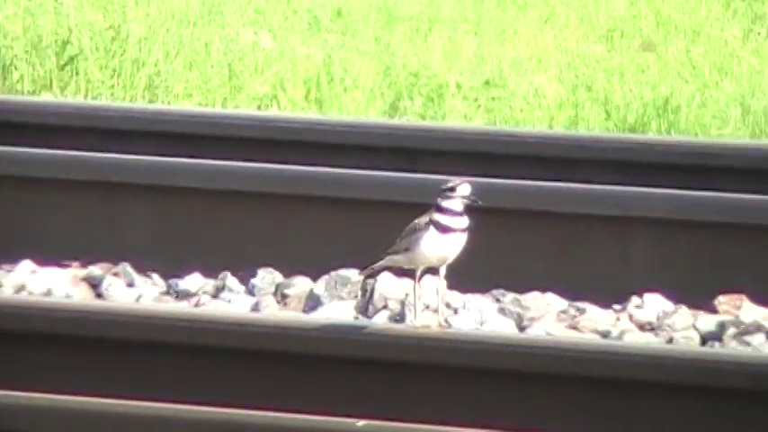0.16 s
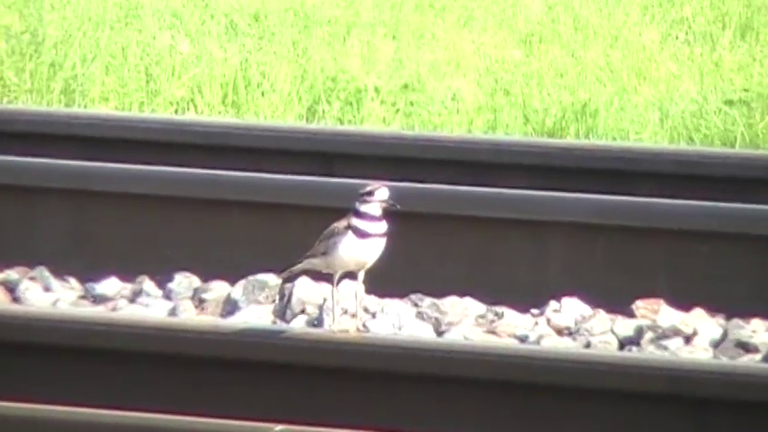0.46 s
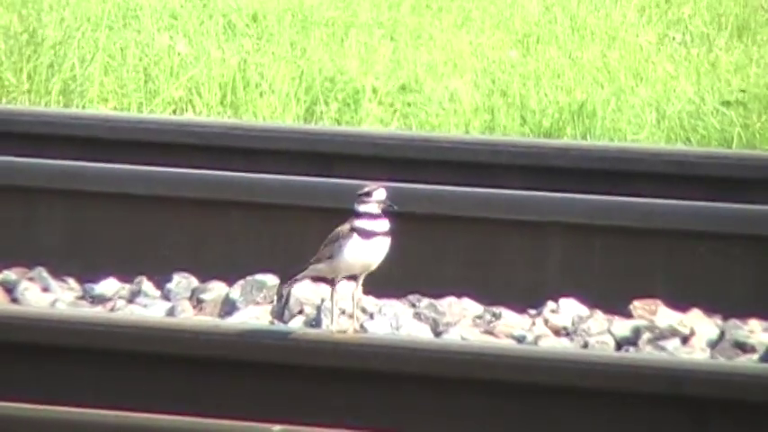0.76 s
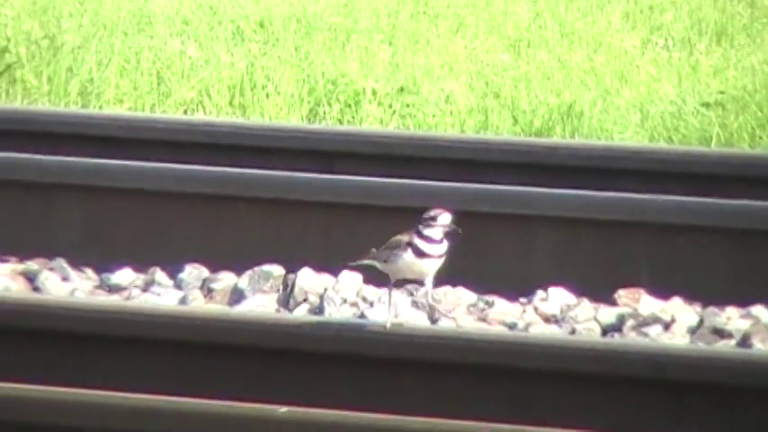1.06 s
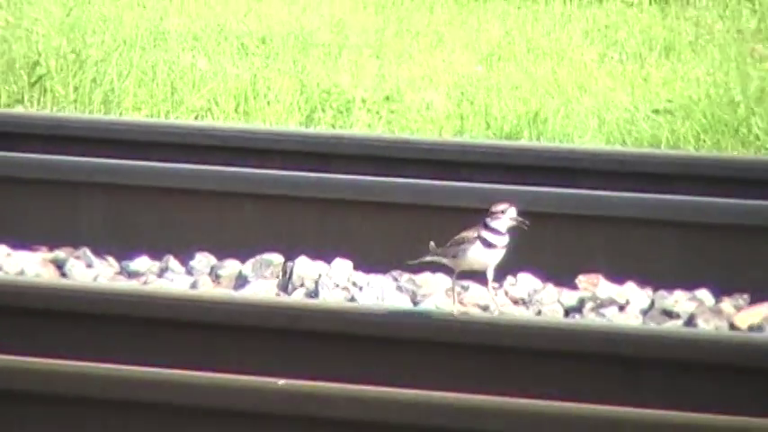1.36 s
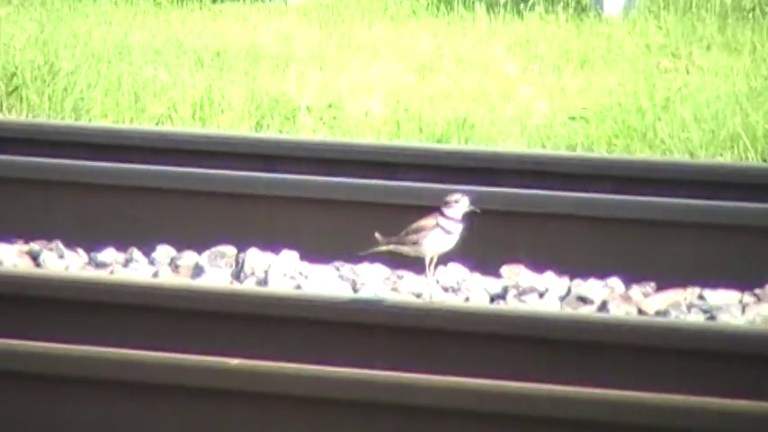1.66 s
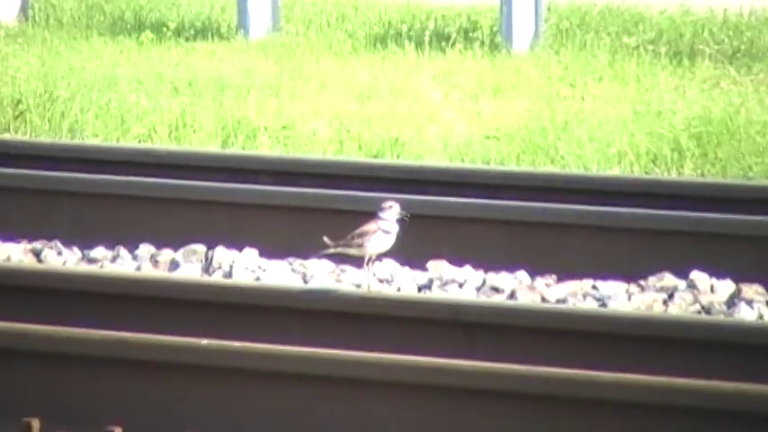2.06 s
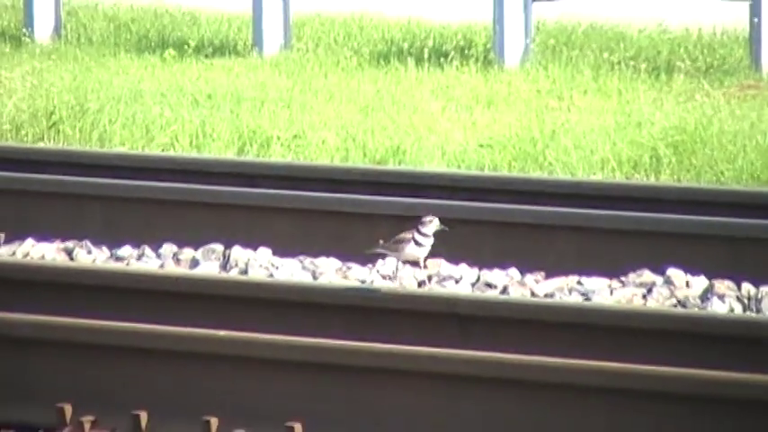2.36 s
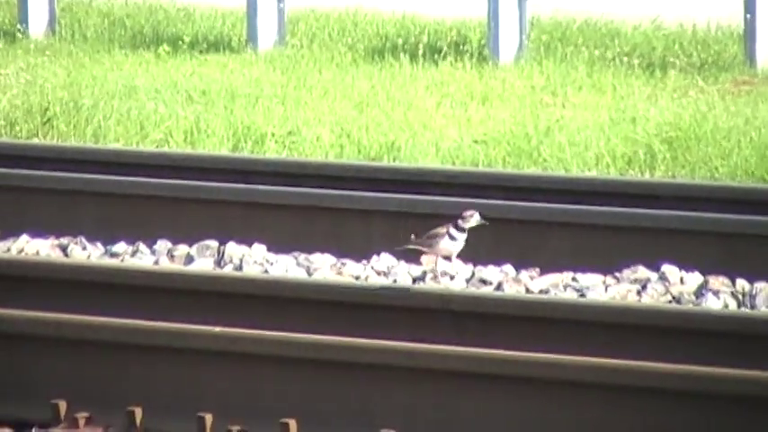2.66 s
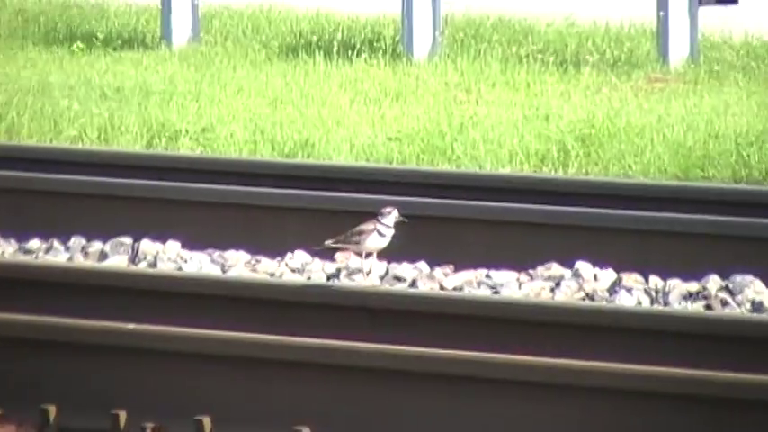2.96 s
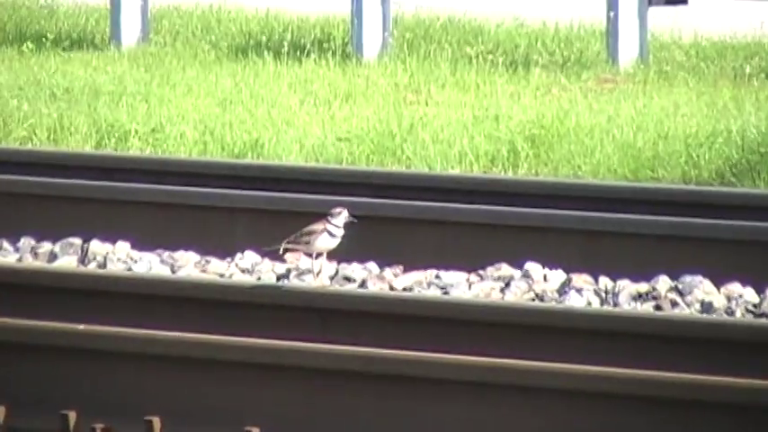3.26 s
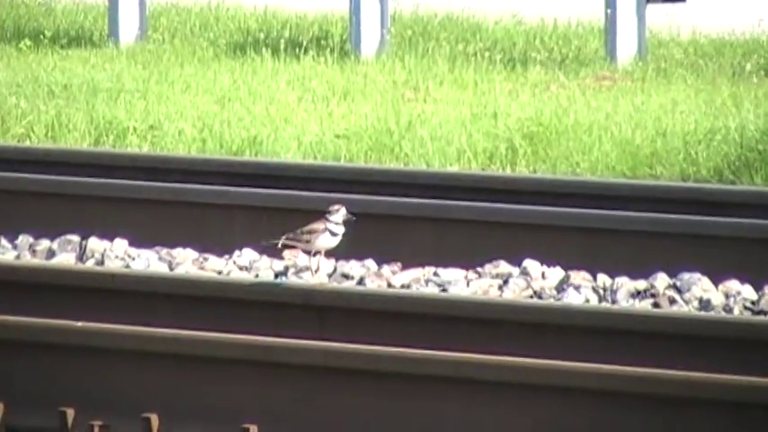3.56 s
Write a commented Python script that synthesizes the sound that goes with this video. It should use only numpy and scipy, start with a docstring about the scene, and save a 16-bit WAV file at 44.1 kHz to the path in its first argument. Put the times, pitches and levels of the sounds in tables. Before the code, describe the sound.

A killdeer pipes six short, clear high notes, evenly spaced, fairly close in open air; a distant engine and traffic rumble behind, small handling ticks, and a fainter bird whistles thinly near the end.

```python
"""Railway ballast: a killdeer gives six clear notes, near-pure tones that flick up, settle and lift.
A farther songbird adds two thin sliding whistles and two tiny chips, with more diffuse tail.
Some way off a six-cylinder engine, built from sines locked to its cycle, pulls up to speed and eases off.
Banded noise makes low traffic rumble, road roar and a hiss that swells as the engine peaks; faint whines
ride on the roar. Resonant bursts make dry ticks, low knocks and a rasp in the killdeer's second note."""
import sys
import numpy as np
from scipy import signal
from scipy.io import wavfile

SR = 44100
rng = np.random.default_rng(int(sys.argv[2]) if len(sys.argv) > 2 else 0)


def persist_wave(psi):
    """Save psi, clipped to +-1, as 16-bit WAV."""
    counts = np.round(np.clip(psi, -1, 1) * 32767).astype(np.int16)
    wavfile.write(sys.argv[1], SR, np.atleast_2d(counts).T)


N = 164052
T = np.arange(N) / SR  # seconds

# Stereo balance of the background: f/Hz, left minus right/dB
BACKGROUND_BALANCE = [(30, -5), (70, -5), (170, 2), (350, 2.5), (700, 1.6), (1400, 0), (5000, -1),
                      (10000, -0.5)]


def from_db(db):
    """Decibels to gain."""
    return 10 ** (np.asarray(db) / 20)


def rms_one(x):
    """Scale to rms 1."""
    return x / np.sqrt(np.mean(x ** 2) + 1e-20)


def in_time(rows):
    """A curve of (t/s, value) read at every sample."""
    return np.interp(T, *np.transpose(rows))


def at_hz(points, hz):
    """Read a curve of (f/Hz, value) on a log-frequency axis."""
    f, value = np.transpose(points)
    return np.interp(np.log(hz), np.log(f), value)


def pan(db):
    """Left and right gains for a left-minus-right level difference in dB."""
    return from_db(np.array([[db], [-db]]) / 2)


def turns(hz):
    """Running phase of a pitch curve, in radians."""
    return 2 * np.pi * np.cumsum(hz) / SR


def drift(rate_hz):
    """Random motion of spread 1: noise through two equal poles at rate_hz, run at SR / 40."""
    pole = np.exp(-2 * np.pi * rate_hz * 40 / SR)
    noise = rng.standard_normal(N // 40 + 2002)
    slow = signal.lfilter([1], [1, -2 * pole, pole ** 2], noise)[2000:]  # drop the settling
    return np.interp(np.arange(N) / 40, np.arange(len(slow)), rms_one(slow))


def resonate(x, hz, width_hz):
    """One resonance with gain 1 on top."""
    return signal.lfilter(*signal.iirpeak(hz, hz / width_hz, fs=SR), x + 1e-18)


def gate(t, length, attack, release):
    """Rounded attack, hold and release, all in seconds."""
    opening = np.sin(np.pi / 2 * np.clip(t / attack, 0, 1))
    closing = np.sin(np.pi / 2 * np.clip((length - t) / release, 0, 1)) ** 2
    return opening * closing


def scatter(x):
    """Diffuse tail thrown back by grass, rails and trees: decaying noise, different on each side."""
    t60_s, build_s = 1.5, .024
    t = T[:SR]
    tail = rng.standard_normal((2, SR)) * from_db(-60 * t / t60_s) * np.minimum(t / build_s, 1)
    return signal.fftconvolve(x[None], rms_one(tail) / np.sqrt(SR), axes=1)[:, :N]


def killdeer():
    """A near-pure tone flicks up to a crest, settles, sags and lifts; echoes vary as the bird runs."""
    # Notes: t/s, length/s, level/dB, crest f/Hz, held f/Hz, crest accent/dB, echo delay/s, echo level/dB
    notes = [(0.1187, 0.12, -33, 4750, 4357, -2, 0.062, -17),
             (0.709, 0.12, -31.5, 4855, 4400, 2, .024, -24),
             (1.3567, 0.12, -34.5, 4930, 4410, 1.5, 0.037, -23),
             (2.082, 0.12, -34.5, 4890, 4450, 0.5, .035, -23),
             (2.8627, 0.124, -34.5, 4730, 4420, 0, 0.043, -22),
             (3.5013, 0.12, -34.5, 4990, 4480, -1, .042, -14)]
    # Partials of the voice: multiple of the sung pitch, level on the held part/dB, level on the crest/dB
    partials = [(.5, -26, -21), (1, 2, 5), (2, -27, -21), (2.5, -43, -41), (3, -46, -49)]
    crest_s, rise_s, fall_s, crest_roundness = .01294, .01216, .019, 2.28
    sag_hz, sag_at_s, sag_width_s = 45, .087, .017
    lift_hz, lift_s = 125, .011
    waver_hz, waver_db, waver_rate_hz = 8, .6, 160
    tail_db = -23.5

    voice, echoes = np.zeros(N), np.zeros(N)
    pitch_waver = waver_hz * drift(waver_rate_hz)
    level_waver = waver_db * drift(waver_rate_hz)
    for start, length, db, crest_hz, held_hz, accent_db, echo_s, echo_db in notes:
        span = (T >= start) & (T < start + length)
        t = T[span] - start
        crest_width = np.where(t < crest_s, rise_s, fall_s)
        crest = np.exp(-np.abs((t - crest_s) / crest_width) ** crest_roundness)
        lift = lift_hz * np.exp((t - length) / lift_s)
        sag = sag_hz * np.exp(-((t - sag_at_s) / sag_width_s) ** 2)
        phase = turns(held_hz + (crest_hz - held_hz) * crest + lift - sag + pitch_waver[span])
        tone = sum(from_db(held_db + (top_db - held_db) * crest) * np.sin(k * phase)
                   for k, held_db, top_db in partials)
        level = from_db(db + accent_db * crest + level_waver[span])
        note = np.sqrt(2) * tone * level * gate(t, length, attack=.009, release=.012)
        voice[span] += note
        echoes += from_db(echo_db) * np.interp(T - echo_s, T[span], note, left=0, right=0)
    # the echo carries the crest of a note better than its held part
    echoes = resonate(echoes, hz=4900, width_hz=550)
    return (voice + echoes) * pan(db=-1.7) + from_db(tail_db) * scatter(voice)


def far_birds():
    """Two thin whistles swell and slide onto a level pitch, with two tiny high chips, wetter with distance."""
    # Calls: t/s, length/s, level/dB, first f/Hz, last f/Hz, slide/s, swell/s
    whistles = [(2.865, 0.019, -48, 7900, 8150, .01, .006), (3.06, 0.302, -44, 5118, 5028, .072, 0.085),
                (3.487, .022, -51.5, 7100, 7400, .012, 0.0074), (3.588, 0.15, -44, 4980, 4900, .062, 0.035)]
    waver_hz, waver_db, lead_in_db = 7, 1.2, -16
    echo_s, echo_db, tail_db = .08, -9, -15

    voice, pitch_waver = np.zeros(N), waver_hz * drift(40)
    for start, length, db, first_hz, last_hz, slide, swell_s in whistles:
        t = T - start
        pitch = last_hz + (first_hz - last_hz) * np.exp(-(t / slide) ** 2) + pitch_waver
        swell = from_db(lead_in_db * np.clip(1 - t / swell_s, 0, 1))
        tone = np.sqrt(2) * from_db(db) * np.sin(turns(pitch))
        voice += tone * swell * gate(t, length, attack=.005, release=length / 10)
    voice = voice * from_db(waver_db * drift(25))
    echo = from_db(echo_db) * np.interp(T - echo_s, T, voice)
    return (voice + echo) * pan(db=-2.0) + from_db(tail_db) * scatter(voice)


def ticks_knocks_and_rasp():
    """Dry ticks, low knocks and a rasp in the killdeer's voice: a snap and gritty trace in a resonance."""
    # Bursts: t/s, peak level/dB ahead of panning, centre f/Hz, width/Hz
    # The pair near .74 s is the rasp in the killdeer's second note, where its voice breaks register
    bursts = [(0.0332, -20.5, 5200, 6000), (.548, -25, 800, 300), (.741, -26, 4960, 1700),
              (.748, -36, 4830, 1500), (.977, -18.5, 780, 300), (1.039, -29, 3000, 2500),
              (1.17, -24, 850, 295), (1.775, -39, 9600, 1410), (2.851, -31, 8800, 2980),
              (3.5448, -14.5, 3150, 2600)]
    grit_db, grit_decay_s = -20, .003
    top_ratio, top_limit_hz = 2.6, 10200

    out, t = np.zeros((2, N)), T[:SR // 50]
    for start, db, hz, width_hz in bursts:
        snap = t == 0
        grit = from_db(grit_db) * rng.standard_normal((2, len(t))) * np.exp(-t / grit_decay_s)
        ringing = resonate(resonate(snap + grit, hz, width_hz), hz, 2 * width_hz)
        # lower bursts are softer
        soften = signal.butter(4, min(top_ratio * hz, top_limit_hz), fs=SR, output="sos")
        burst = signal.sosfilt(soften, ringing)
        i = int(start * SR)
        out[:, i:i + len(t)] += from_db(db) * burst / np.abs(burst).max()
    return out * pan(db=-1.5)


def engine(speed):
    """The firing note, and the orders of uneven cylinders sweeping through the exhaust resonances."""
    # Firing note: t/s, level/dB
    firing_level = [(0, -36.5), (.3, -30), (.6, -38.5), (1.1, -39.5), (1.7, -45.5), (2.4, -44.5),
                    (3.05, -41.5), (3.72, -46.5)]
    # Gain of the whole exhaust drone: t/s, level/dB
    load = [(0, -36.5), (.8, -38), (1.5, -35), (2.0, -33.5), (2.45, -30), (2.75, -34), (3.05, -32),
            (3.4, -36), (3.72, -40.5)]
    # Engine orders: multiples of the cycle rate
    order_numbers = [9, 12, 15, 18, 20, 21, 22, 23, 24, 31]
    # Relative level of each order inside a resonance: level/dB
    order_db = [3, -2, -5, -5, 1, -11, 0, -2, -2, -1]
    # Exhaust resonances that lift passing orders: f/Hz, width/Hz
    pipes = [(314, 28), (368, 24)]
    cylinders = 6
    off_pipe_db = -11
    order_wander = .35  # radians; uneven firing blurs the phase of each order

    cycle, drone = turns(speed), 0  # cycle phase in radians
    firing = np.sqrt(2) * from_db(in_time(firing_level) + drift(12)) * np.sin(cylinders * cycle)
    for k, db in zip(order_numbers, order_db):
        in_pipe = sum(np.exp(-((k * speed - hz) / width_hz) ** 2) for hz, width_hz in pipes)
        phase = k * cycle + rng.uniform(0, 2 * np.pi) + order_wander * drift(8.6)
        level = from_db(db + off_pipe_db * (1 - in_pipe) + drift(8.3))
        drone = drone + level * np.sin(phase)
    return firing * pan(db=4) + from_db(in_time(load)) * drone * pan(db=4)


def banded_noise(spectrum, patchy_db):
    """Stereo noise in narrow bands, each with its own level, flicker, likeness and balance; rms 1."""
    # Likeness of the two sides: f/Hz, correlation (1 same, 0 unrelated, -1 opposite)
    likeness = [(25, -.7), (55, -.2), (90, .6), (140, .94), (250, .93), (500, .93), (1000, .85),
                (2000, .55), (4000, .3), (8000, 0), (14000, -.1)]
    edges = np.geomspace(20, 16000, 44)  # Hz
    out, white = 0, rng.standard_normal((2, 2, N))
    for k, (low, high) in enumerate(zip(edges, edges[1:])):
        hz = np.sqrt(low * high)
        if spectrum[0][0] <= hz <= spectrum[-1][0]:
            band = signal.butter(4, [low, high], "band", fs=SR, output="sos")
            mid, side = signal.sosfilt(band, white[k % 2])  # neighbouring bands use separate noise
            alike = np.clip(at_hz(likeness, hz), -1, 1)
            stereo = np.sqrt(1 + alike) * mid + np.sqrt(1 - alike) * side * [[1], [-1]]
            level = from_db(at_hz(spectrum, hz) + patchy_db * drift(19))
            out = out + level * pan(at_hz(BACKGROUND_BALANCE, hz)) * stereo
    return rms_one(out)


def traffic(speed):
    """Low rumble and road roar: banded noise that throbs once per engine cycle."""
    # Rumble spectrum: f/Hz, relative level/dB per Hz
    rumble_spectrum = [(20, -34), (40, -9), (60, -6.5), (90, -5), (130, -1), (220, 2.5), (310, -5),
                       (420, -7.5), (600, -13.5), (1000, -16), (2000, -70)]
    # Rumble in time, ahead of its trim: t/s, level/dB
    rumble_level = [(0, -29.5), (.15, -30), (.45, -28.5), (.8, -30), (.95, -31.5), (1.35, -30), (1.7, -32),
                    (2.1, -32), (2.6, -33.5), (2.9, -30), (3.2, -33), (3.72, -29)]
    # Road roar spectrum: f/Hz, relative level/dB per Hz
    roar_spectrum = [(100, -40), (350, -2), (550, -0.5), (800, -2.5), (1100, -2.5), (1500, -5),
                     (1900, -11.5), (2600, -18.5), (4000, -26.5), (8000, -31.5), (16000, -87)]
    # Road roar in time: t/s, level/dB
    roar_level = [(0.0, -34.5), (0.05, -38.5), (1.13, -34), (1.16, -37), (1.17, -32), (1.24, -35),
                  (2.24, -32.5), (2.81, -30), (3.68, -33), (3.72, -32)]
    rumble_trim_db, throb_depth = .5, .02

    rumble = from_db(rumble_trim_db + in_time(rumble_level)) * banded_noise(rumble_spectrum, patchy_db=1.5)
    roar = from_db(in_time(roar_level)) * banded_noise(roar_spectrum, patchy_db=1.33)
    return (rumble + roar) * (1 + throb_depth * np.sin(turns(speed)))


def howls():
    """Noise in resonances of the rumble and roar, each swelling and fading once."""
    # Resonances: f/Hz, width/Hz, level at the loudest/dB, loudest at t/s, spread/s
    resonances = [(242, 45, -30, 0.32, 0.17), (181, 35, -36.5, 0.77, 0.2), (235, 54, -31.5, 3.386, 0.25),
                  (1385, 54, -46, 1.04, 1), (2430, 1600, -44.5, 3, 0.91)]
    out = 0
    for hz, width_hz, db, at, spread in resonances:
        noise = rng.standard_normal(N)
        howl = rms_one(resonate(resonate(noise, hz, width_hz), hz, 2 * width_hz))
        swell = from_db(db) * np.exp(-((T - at) / spread) ** 2)
        out = out + swell * howl * pan(at_hz(BACKGROUND_BALANCE, hz))
    return out


def whines():
    """Faint wavering tones in the road roar, probably from tyres, each coming and going once."""
    # Tones: f/Hz, level at the loudest/dB, loudest at t/s, spread/s
    tones = [(1165, -36, 2.48, 0.14), (1167, -40, 2.76, 0.091), (1173, -39, 2.88, 0.17),
             (1580, -41, 2.594, .07), (1554, -40.5, 2.84, 0.14), (774, -42, 2.56, 0.1),
             (860, -43, 2.88, 0.13), (1066, -44, 2.7, 0.34)]
    waver_hz, waver_db, waver_rate_hz = 14, 2.2, 22
    out = 0
    for hz, db, at, spread in tones:
        level = from_db(db + waver_db * drift(19)) * np.exp(-((T - at) / spread) ** 2)
        tone = np.sqrt(2) * np.sin(turns(hz + waver_hz * drift(waver_rate_hz)))
        out = out + level * tone * pan(at_hz(BACKGROUND_BALANCE, hz))
    return out


def hiss():
    """Banded noise that falls away above an edge to a faint trace of air."""
    # Hiss spectrum ahead of the edge: f/Hz, relative level/dB per Hz
    hiss_spectrum = [(1000, -10), (2500, -1), (4500, 1), (6000, -.2), (8000, -2.7), (9500, -4.3),
                     (11000, -9.5), (12500, -16), (15800, -24)]
    # Hiss in time, ahead of its trim and edge: t/s, level/dB
    hiss_level = [(0.0, -58), (0.33, -53.5), (0.9, -56.5), (1.12, -53), (1.52, -56), (1.9, -60), (2.1, -54),
                  (2.3, -60), (2.43, -51.5), (2.55, -47.5), (2.7, -49.3), (3.1, -49.5), (3.72, -53.5)]
    trim_db, edge_hz, air_db = 4, 9900, -81

    noise = from_db(trim_db + in_time(hiss_level)) * banded_noise(hiss_spectrum, patchy_db=1.7)
    edge = signal.butter(7, edge_hz, fs=SR, output="sos")
    air = from_db(air_db) * rng.standard_normal((2, N))
    return signal.sosfilt(edge, noise) + air


def scene():
    """Birds, ticks and knocks in front of the distant engine and traffic."""
    # Engine speed: t/s, cycle rate f/Hz
    cycle_rate = [(0, 12.5), (.5, 13.2), (1.0, 13.95), (1.5, 14.63), (2.0, 15.22), (2.25, 15.5),
                  (2.5, 15.87), (2.8, 16.42), (2.98, 16.68), (3.12, 16.2), (3.3, 15.25), (3.72, 13.8)]
    speed = in_time(cycle_rate)
    foreground = killdeer() + far_birds() + ticks_knocks_and_rasp()
    background = engine(speed) + traffic(speed) + howls() + whines() + hiss()
    return foreground + background


def record(dry):
    """A steep elliptic low-pass cuts the top at 15.7 kHz."""
    return signal.sosfilt(signal.ellip(10, .1, 80, 15700, fs=SR, output="sos"), dry)


dry = scene()
out = record(dry)
persist_wave(out)
```